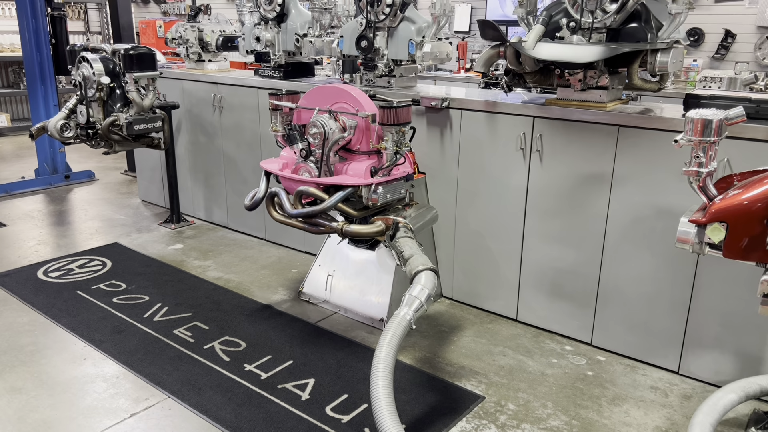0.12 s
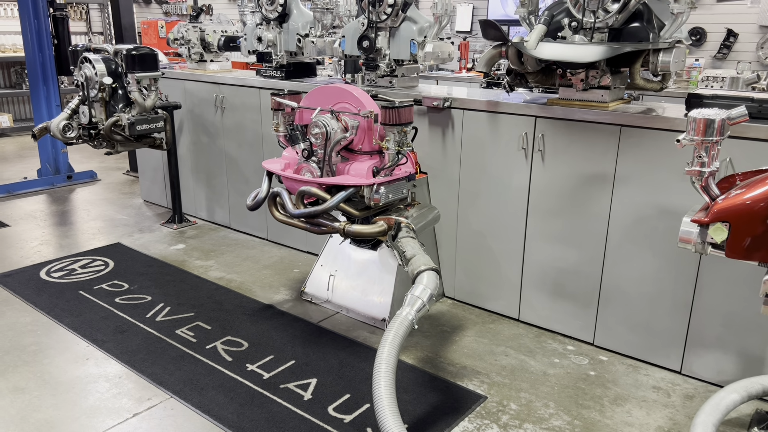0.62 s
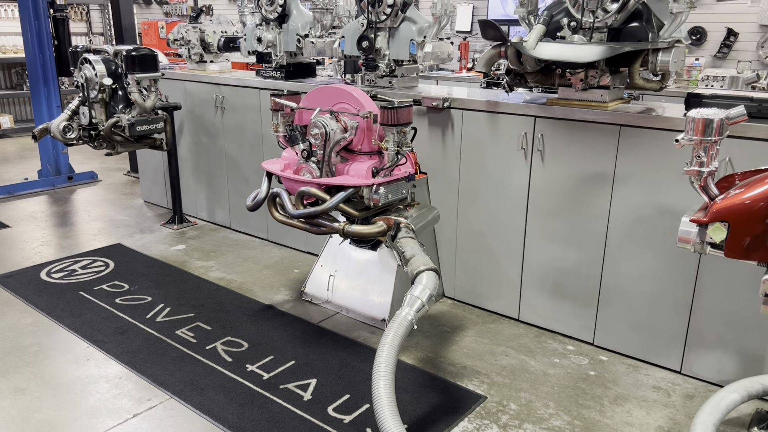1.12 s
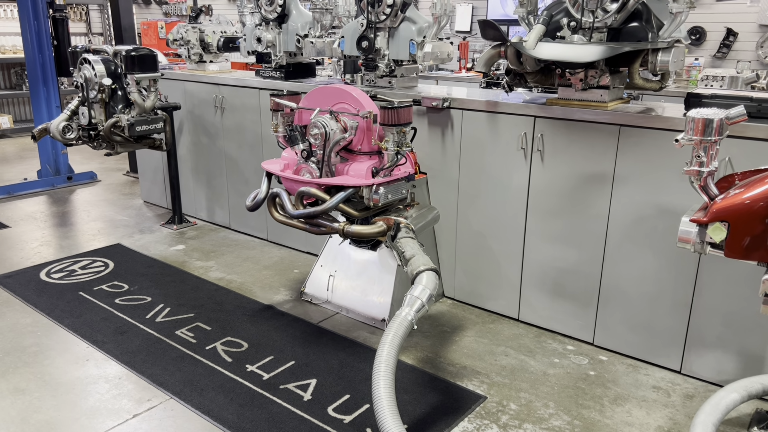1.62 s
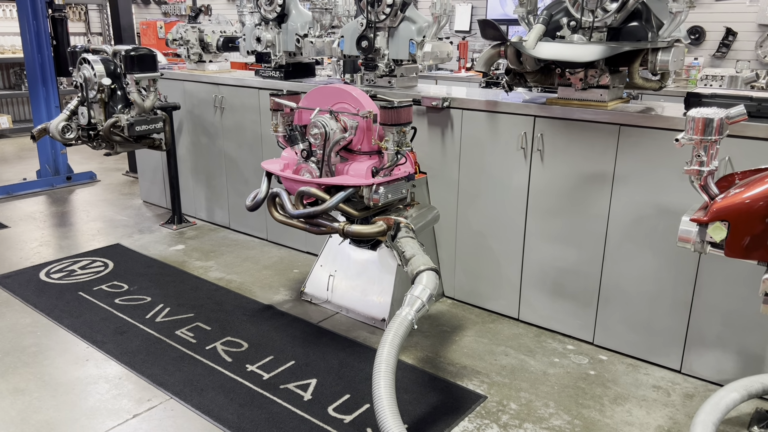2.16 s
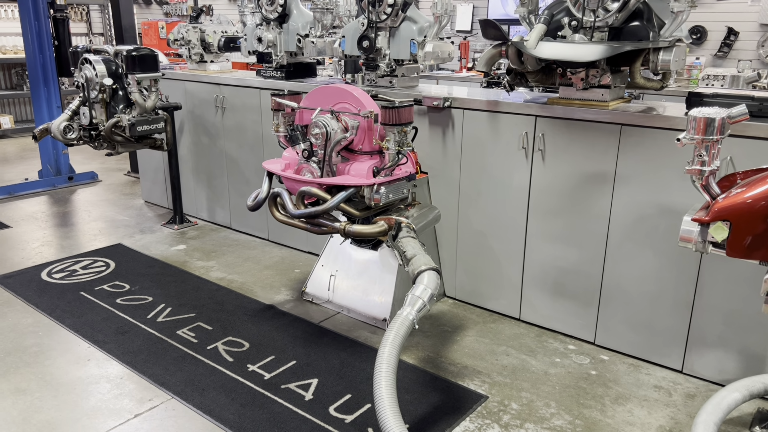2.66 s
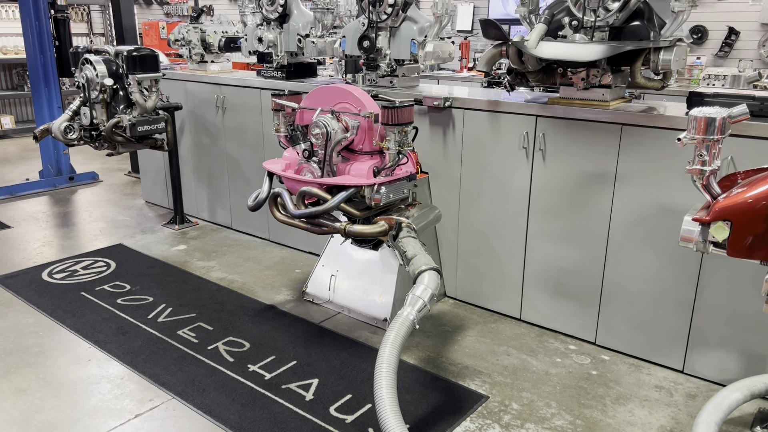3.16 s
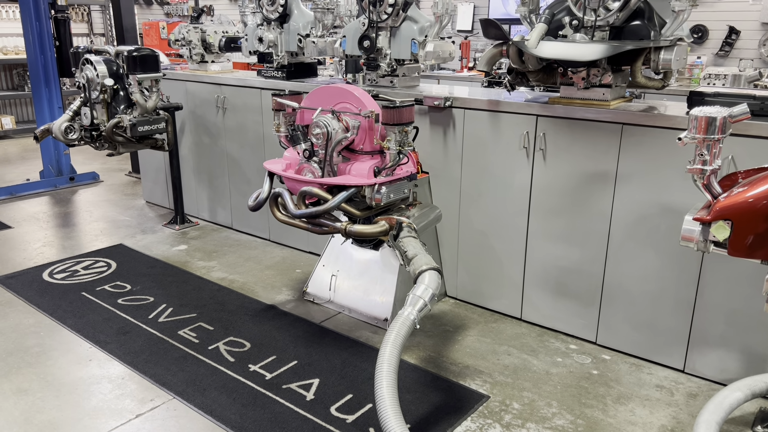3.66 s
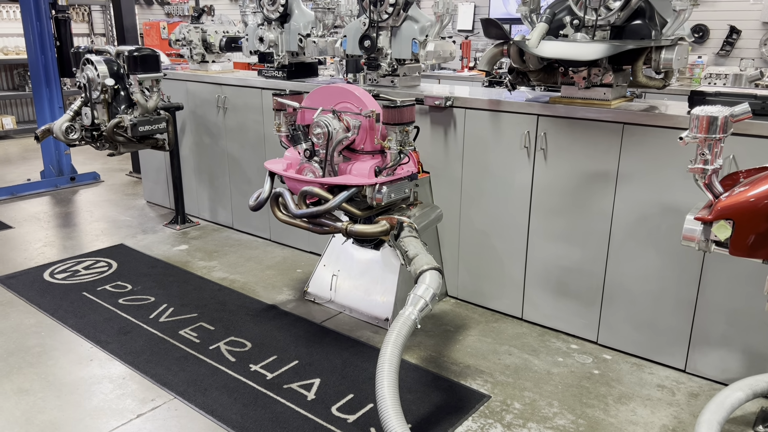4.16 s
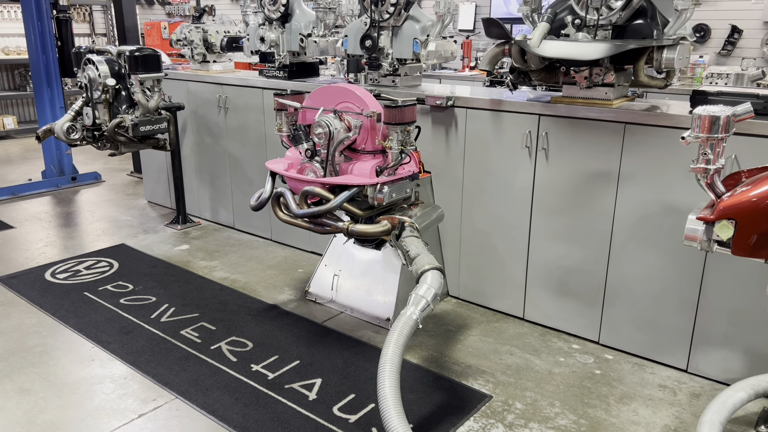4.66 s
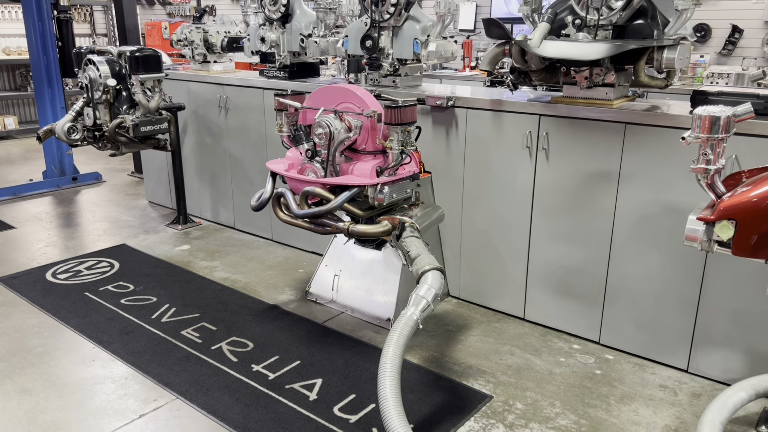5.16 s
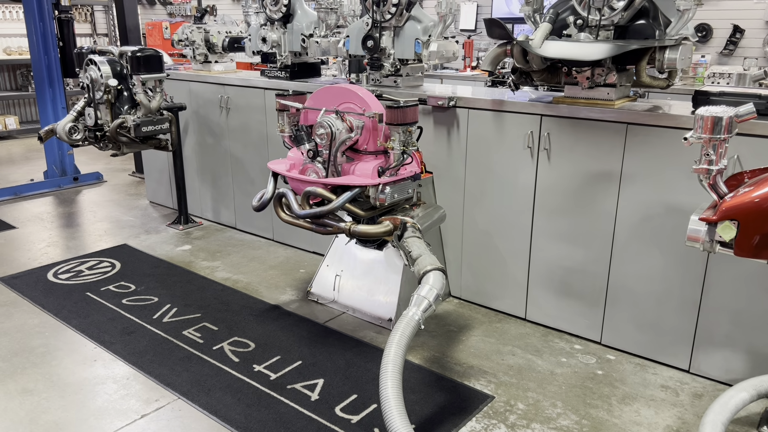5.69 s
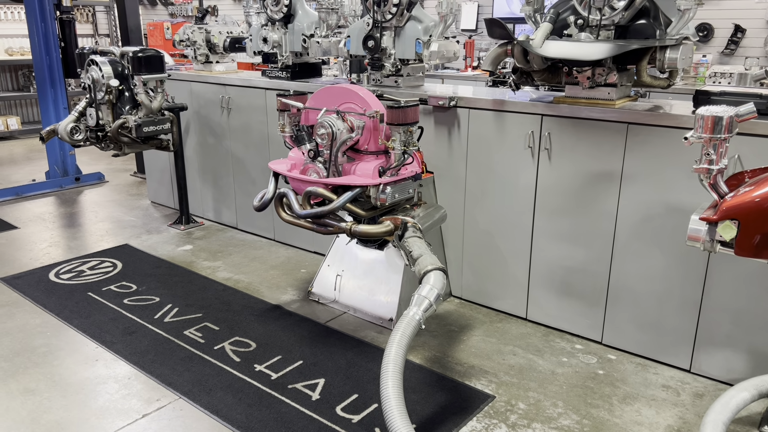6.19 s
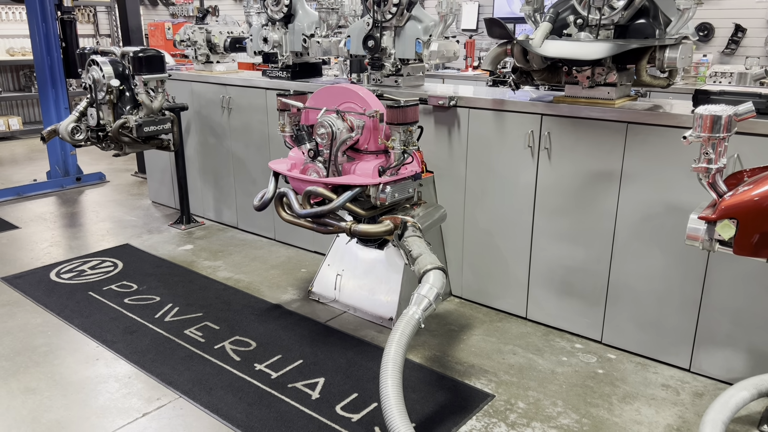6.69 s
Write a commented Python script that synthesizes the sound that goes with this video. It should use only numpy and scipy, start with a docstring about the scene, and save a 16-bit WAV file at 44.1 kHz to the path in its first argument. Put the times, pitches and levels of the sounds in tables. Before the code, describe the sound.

In a hard indoor workshop, a small air-cooled four-cylinder engine is already held at high revs, exhaust booming through a hose and open carburettors barking. The throttle shuts almost at once and it tumbles to a soft, fluttering idle with valve clatter and light ticks. Around three seconds a gentle blip starts a series of five, the later ones louder, each swooping up and sagging. Close, mono, steady position; still running at the end.

```python
"""The exhaust of a small air-cooled flat-four booms through a long hose and the room's bass modes.
The engine is held fast, dropped to idle, then blipped five times; each firing puff rings the bass peaks.
Open carburettors bark with sliding tones and gulps of air noise. Valve gear clatters in bursts of noise
and ticks, the cooling fan rushes, its tin shroud hums, and the generator whines as one sweeping tone."""
import sys
import numpy as np
from scipy import signal
from scipy.fft import rfft, irfft, next_fast_len
from scipy.io import wavfile
from scipy.ndimage import uniform_filter1d, map_coordinates

SR = 44100
rng = np.random.default_rng(int(sys.argv[2]) if len(sys.argv) > 2 else 0)


def gain_from_db(level_db):
    """Convert decibel levels to linear amplitude factors (20 dB per decade)."""
    decades = np.asarray(level_db, float) / 20
    return 10 ** decades


def dump(signal):
    """Clip the signal to [-1, 1] and save it as 16-bit WAV at the path in sys.argv[1]."""
    limited = np.clip(np.atleast_2d(signal).T, -1, 1)
    pcm = np.round(limited * 32767).astype(np.int16)
    wavfile.write(sys.argv[1], SR, pcm)


N = 300321

# engine speed over time: time_s, firing_hz
ENGINE_SPEED = [(0, 118.6), (.38, 118), (.5, 98), (.7, 69), (.8, 57), (.93, 46.5), (1.05, 42), (1.2, 37.5),
                (1.4, 33.5), (1.72, 30.2), (2.3, 31.2), (3.14, 31.6), (3.29, 52), (3.45, 57), (3.67, 87),
                (3.73, 85.5), (4.02, 65), (4.25, 88), (4.31, 87), (4.55, 68.5), (4.63, 80.5), (4.78, 107.5),
                (4.84, 108), (5.08, 87), (5.44, 59), (5.52, 55.5), (5.6, 56), (5.86, 100.5), (5.9, 101),
                (6.13, 87), (6.45, 60.5), (6.52, 56.5), (6.66, 55.5), (6.81, 52)]
# bass peaks and notches of hose and room: pitch_hz, gain_db
HOSE_AND_ROOM = [(20, -85), (31, -24), (53, 0), (58, -12.5), (65, -1.5), (71.5, -6.5), (79.5, 8),
                 (86.5, -2), (93, 5), (101, 6), (109, -7), (117, -8), (126, -9.5), (145, -18.5),
                 (165, -9.5), (178, -24.5), (190, -18), (215, -22), (250, -23), (600, -78), (2000, -120)]
# cylinders in firing order: exhaust_db, clatter_db
CYLINDER_OFFSETS = [(0.6, 1), (-0.6, -1), (0.4, 1.5), (-0.4, -1.5)]
# colour of the intake stacks: pitch_hz, relative_level_db
STACK_COLOUR = [(120, -20), (200, -1), (318, -2), (400, 0.5), (520, 0), (870, -14.5), (1730, -16.5),
                (3190, -26.5), (5200, -58), (8800, -120)]
# colour of the fan's air noise: pitch_hz, relative_level_db
FAN_COLOUR = [(130, 6.5), (220, -6), (277, 2.5), (320, -20), (420, -12), (577, -11), (728, -3),
              (1060, -8.5), (3320, -14), (6790, -19), (8410, -23.5), (10600, -21), (11600, -25),
              (12300, -32), (15700, -31)]
# colour of the valve gear heard through the case: pitch_hz, relative_level_db
CASE_COLOUR = [(100, -20), (170, -7), (253, 7), (330, -19), (410, -7), (520, -11), (700, 4), (883, -5),
               (1800, -11), (2600, -8), (5650, -17), (8500, -19.5), (11300, -21.5), (12100, -30.5),
               (15700, -30)]
# the generator housing favours some pitches: pitch_hz, level_db
WHINE_COLOUR = [(700, -79), (1300, -60), (1600, -53), (1800, -49), (1980, -40), (2200, -46), (2450, -37),
                (2690, -36.5)]
# intake tones at the held speed: pitch_hz, relative_level_db
HELD_TONES = [(177.6, -38), (209.9, -41), (236.9, -31), (263.8, -34), (323.0, -34), (355.3, -37),
              (382.2, -37), (441.4, -29), (500.6, -37), (532.9, -35), (559.9, -30), (592.2, -35),
              (619.1, -39), (651.4, -37), (678.3, -42), (710.6, -39), (796.7, -38), (855.9, -42),
              (974.4, -39), (1007, -42), (1034, -41), (1093, -45), (1125, -40), (1152, -43), (1184, -41),
              (1244, -46), (1276, -46), (1357, -42), (1448, -46), (1744, -49), (1863, -46)]
HELD_FIRING_HZ = 118.3
# throttle openings: wide_open_s, let_go_s, bark_start_db, bark_end_db, exhaust_gain_db, clatter_gain_db
THROTTLE_OPENINGS = [(0, 0.348, -21, -21.5, 9, -0.4), (3.22, 3.275, -38, -45, 1.5, 2),
                     (3.502, 3.564, -26.5, -26, 4, -0.3), (4.09, 4.16, -24.5, -25.5, 2, 1.5),
                     (4.596, 4.785, -22.5, -24, 5, 2.5), (5.65, 5.813, -23.5, -24, 5, 3.5)]
# how loudness follows speed: idle_db (before the layer's own gain), per_speed_doubling_db, off_stop_gain_db
EXHAUST_LEVELS = (-34, 2.53, 5.68)
INTAKE_LEVELS = (-49.5, 5.93, 3.66)
CLATTER_LEVELS = (-49.5, 8.62, 4.61)
# harder ticks as the throttle snaps: time_s, level_db (before the soft onset), pitch_hz
SNAP_TICKS = [(3.4595, -29, 9200), (3.5694, -30, 9140), (3.6394, -41, 9750), (3.691, -42, 10200),
              (4.0594, -35, 9270), (4.114, -31, 9200)]

IDLE_FIRING_HZ = 31
FLYWHEEL_S = 0.05  # inertia rounds each change of speed
BARK_RISE_DB_PER_S, BARK_FALL_DB_PER_S = 219, 127
# the throttle drops onto its stop, and later stays a little off it between blips
ON_STOP_S, OFF_STOP_S, SETTLE_S = 0.47, 3.18, 0.12
# wet manifolds keep the firing partly strong a little after the throttle shuts
FUEL_LINGERS_S, FUEL_SHARE = 0.22, 0.41
# an open throttle sharpens each puff: overtones above EDGE_HZ gain with the exhaust, up to EDGE_TOP_DB
EDGE_HZ, EDGE_SHUT_DB, EDGE_PER_DB, EDGE_TOP_DB = 107, -2.5, 0.1, 1
# a loose valve ticks once every four firings; the phase is a share of that cycle
TICK_FROM_S, TICK_UNTIL_S, TICK_PHASE = 0.75, 3.1, 0.47
TICK_DB, TICK_SCATTER_DB, TICK_HZ, TICK_SCATTER_HZ = -47, 1.5, 9720, 60  # level before the soft onset
WHINE_RATIO = 22.7  # whine Hz per firing Hz
WHINE_SWELLS_S, WHINE_BEFORE_DB = 4, -9  # the whine is fainter until then
HOSE_S = 0.025  # the boom comes this late through the hose, so the whine leads it


def exhaust(count, speed, level_db, edge_db):
    """Firing puffs ring the bass peaks, so each order swells and dips as it sweeps through them."""
    second = np.arange(SR) / SR
    # the engine is already running before the start and keeps running past the end
    before = (second - 1) * speed[0]
    after = count[-1] + second * speed[-1]
    count = np.r_[before, count, after]
    firing = np.arange(int(count[0]), int(count[-1]))
    at = np.interp(firing, count, np.arange(len(count)))
    spacing = np.gradient(at)  # samples from puff to puff
    slowing = np.clip(30 * np.gradient(spacing) / spacing, 0, 1)
    # lean firings stumble as the engine slows, below 75 firings a second
    chance = rng.standard_normal((2, len(firing)))
    stumble = slowing * np.clip(75 * spacing / SR - 1, 0, 1)
    scatter_db = (0.4 + 1.2 * slowing) * chance[0] - 10 * stumble * np.abs(chance[1])
    cylinder_db = np.transpose(CYLINDER_OFFSETS)[0][firing % 4]
    size = gain_from_db(cylinder_db + scatter_db) * np.sqrt(spacing)  # steady power at any speed
    level_db = np.pad(level_db, SR, "edge")
    puffs = gain_from_db(level_db + 28.0) * np.bincount(at.astype(int), size, len(count))
    # drop the lead-in second, and 20 ms more because the ringing peaks that long after each puff
    boom = filtered(puffs, causal(HOSE_AND_ROOM))[SR + SR // 50:][:N]
    overtones = filtered(boom, lambda f: 1 / (1 + (EDGE_HZ / (f + 1)) ** 12))
    return boom + (gain_from_db(edge_db) - 1) * overtones


def intake(count, speed, level_db):
    """Orders of the cycle slide along the stack colour; below the held speed they blur into air noise."""
    hz, db = np.transpose(HELD_TONES)[:, :, None]
    order = np.round(4 * hz / HELD_FIRING_HZ) / 4  # waves per firing, in quarters
    size = gain_from_db(db + along(STACK_COLOUR, order * speed) - along(STACK_COLOUR, hz))
    blur = np.clip(3 * (1 - speed / HELD_FIRING_HZ), 0, 1)
    drift = np.array([wobble(30) for _ in HELD_TONES])
    phase = 2 * np.pi * (order * count + rng.random(hz.shape)) + 1.37 * blur * drift
    # keep the tones' total power steady as the colour changes
    tones = (size * np.sin(phase)).sum(0) / np.sqrt((size ** 2).sum(0) / 2)
    gulp_db = 3.2 * rng.standard_normal(size=1000)[count.astype(int)]
    suck = unit(0.28 + gain_from_db(gulp_db) * np.sin(np.pi * count) ** 4)  # one uneven gulp a firing
    air_share = 0.1 + 0.5 * blur
    air = gain_from_db(level_db) * np.sqrt(air_share) * suck * hiss(STACK_COLOUR)
    tones = gain_from_db(level_db) * np.sqrt(1 - air_share) * tones
    return tones + air + gain_from_db(-2.0) * workshop(air, t60_s=0.33)


def clatter(count, speed, level_db):
    """Valve gear bursts unevenly once a firing; the faster it turns, the more the fan takes over."""
    cylinder_db = np.transpose(CYLINDER_OFFSETS)[1][count.astype(int) % 4]
    blow_db = cylinder_db + 2.8 * rng.standard_normal(size=1000)[count.astype(int)]
    burst = uniform_filter1d(np.exp(-3.5 * (count % 1)) * gain_from_db(blow_db), size=240)
    fast = np.clip((speed - 32) / 30, 0, 1)  # 0 = all valve gear, 1 = all fan
    gear = hiss(CASE_COLOUR) * unit(1.3 + burst)
    fan = hiss(FAN_COLOUR) * unit(2.4 + burst) * gain_from_db(0.44 * wobble(9))
    return gain_from_db(level_db + 3.0) * (np.sqrt(1 - fast) * gear + np.sqrt(fast) * fan)


def ticks(count):
    """Each tick is a short, high, noisy ring with a soft onset, dying by 60 dB in 43 ms."""
    out, t = np.zeros(N), np.arange(SR // 20) / SR
    cycle_count = 4 * (np.arange(count[-1] // 4) + TICK_PHASE)
    cycle_s = np.interp(cycle_count, count, np.arange(N) / SR)
    chance = rng.standard_normal((len(cycle_s), 2))
    loose = [(s, TICK_DB + TICK_SCATTER_DB * a, TICK_HZ + TICK_SCATTER_HZ * b)
             for s, (a, b) in zip(cycle_s, chance) if TICK_FROM_S < s < TICK_UNTIL_S]
    for s, db, hz in loose + SNAP_TICKS:
        unsteady = 0.08 * np.cumsum(rng.standard_normal(len(t)))
        ring = np.sin(2 * np.pi * hz * t + unsteady)
        shape = gain_from_db(db - 60 * t / 0.043) * (1 - np.exp(-t / 0.003))
        out[round(s * SR):][:len(t)] += shape * ring
    return out


def whine(speed):
    """The belt-driven generator sings one thin tone, a little unsteady, in step with the speed."""
    speed = np.interp(np.arange(N) + HOSE_S * SR, np.arange(N), speed)
    tone = np.sin(2 * np.pi * WHINE_RATIO * np.cumsum(speed) / SR + 0.9 * wobble(60))
    early_db = WHINE_BEFORE_DB * np.clip((WHINE_SWELLS_S - np.arange(N) / SR) / 0.33, 0, 1)
    level_db = along(WHINE_COLOUR, WHINE_RATIO * speed) + early_db + 2.5 * wobble(25)
    return np.sqrt(2) * gain_from_db(level_db) * tone


def shroud(level_db):
    """The tin fan shroud hums unevenly on one broad note, its level following the clatter."""
    hum = filtered(rng.standard_normal(N), lambda f: 1 / (1 + ((f - 720) / 60) ** 2))
    return gain_from_db(0.64 * level_db - 23 + 1.9 * wobble(18)) * unit(hum)


def workshop(x, t60_s):
    """The room answers with a diffuse noise tail of unit energy, falling 60 dB in t60_s."""
    t = np.arange(SR // 2) / SR
    tail = rng.standard_normal(len(t)) * gain_from_db(-60 * t / t60_s)
    return signal.fftconvolve(x, tail / np.linalg.norm(tail))[:N]


def throttle():
    """Intake bark level, exhaust and clatter gains in dB, and how far the throttle is off its stop (0-1)."""
    t = np.arange(N) / SR
    start, end, first_db, last_db, exhaust_db, clatter_db = np.transpose(THROTTLE_OPENINGS)[:, :, None]
    rise_db = BARK_RISE_DB_PER_S * np.clip(start - t, 0, None)
    fall_db = BARK_FALL_DB_PER_S * np.clip(t - end, 0, None)
    below_db = rise_db + fall_db
    held_db = first_db + (last_db - first_db) * np.clip((t - start) / (end - start), 0, 1)
    wide = gain_from_db(-below_db)  # 1 while wide open
    off_stop = np.clip(0.5 + np.maximum(ON_STOP_S - t, t - OFF_STOP_S) / SETTLE_S, 0, 1)
    return (held_db - below_db).max(0), (exhaust_db * wide).sum(0), (clatter_db * wide).sum(0), off_stop


def unit(x):
    """Scale to rms 1."""
    return x / np.sqrt(np.mean(x ** 2) + 1e-20)


def curves(rows):
    """One value per sample for each column after the time."""
    s, *cols = np.transpose(rows)
    return [np.interp(np.arange(N) / SR, s, c) for c in cols]


def wobble(rate):
    """A smooth random curve with rate random points a second."""
    return map_coordinates(rng.standard_normal(int(N * rate / SR) + 4), [np.arange(N) * rate / SR])


def filtered(x, response):
    """Shape the spectrum of x by a response (real or complex) of frequency."""
    m = 2 * next_fast_len(len(x) // 2 + SR)
    return irfft(rfft(x, m) * response(np.fft.rfftfreq(m, 1 / SR)), m)[:len(x)]


def hiss(spectrum):
    """Noise of rms 1 with the given colour and no deep bass."""
    def colour(f):
        return gain_from_db(along(spectrum, f)) / (1 + (110 / (f + 1)) ** 4)
    return unit(filtered(rng.standard_normal(N), colour))


def along(points, hz):
    """Read (Hz, dB) points on a log pitch axis."""
    f, db = np.transpose(points)
    return np.interp(np.log(hz + 1), np.log(f), db)


def causal(points):
    """Minimum-phase response through (Hz, dB) points, so that peaks ring after the blow."""
    def response(f):
        cepstrum = irfft(along(points, f) * np.log(10) / 20)
        cepstrum[1:len(f) - 1] *= 2
        cepstrum[len(f):] = 0
        return np.exp(rfft(cepstrum))
    return response


def scene():
    """One engine speed and one throttle drive the parts, which are added into a mono mix."""
    speed = uniform_filter1d(curves(ENGINE_SPEED)[0], size=round(FLYWHEEL_S * SR))
    count = np.cumsum(speed) / SR  # firings so far
    bark_db, exhaust_db, clatter_db, off_stop = throttle()

    def level(law, fed):
        idle_db, per_doubling_db, off_stop_db = law
        return idle_db + per_doubling_db * np.log2(speed / IDLE_FIRING_HZ) + off_stop_db * fed

    lingering = np.interp(np.arange(N) - FUEL_LINGERS_S * SR, np.arange(N), off_stop)
    fuel = np.maximum(off_stop, lingering * FUEL_SHARE)
    edge_db = np.minimum(EDGE_SHUT_DB + EDGE_PER_DB * exhaust_db, EDGE_TOP_DB)
    exhaust_db = exhaust_db + level(EXHAUST_LEVELS, fuel)
    # the bark and the steady intake add as powers
    intake_db = 10 * np.log10(gain_from_db(bark_db) ** 2 + gain_from_db(level(INTAKE_LEVELS, off_stop)) ** 2)
    clatter_db = clatter_db + level(CLATTER_LEVELS, off_stop)
    breath = exhaust(count, speed, exhaust_db, edge_db) + intake(count, speed, intake_db)
    metal = clatter(count, speed, clatter_db) + ticks(count)
    mix = breath + metal + whine(speed) + shroud(clatter_db)
    return mix[None]


def roll_off(x):
    """The treble ends steeply here."""
    return signal.sosfilt(signal.butter(12, 15860, fs=SR, output="sos"), x)


def record(dry):
    """Take the finished mono mix at its own level."""
    return roll_off(dry)


dry = scene()
out = record(dry)
dump(out)
```